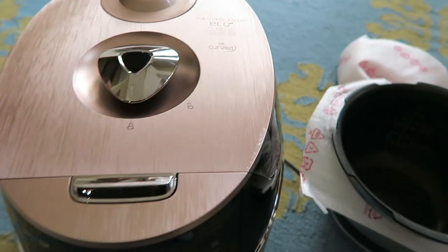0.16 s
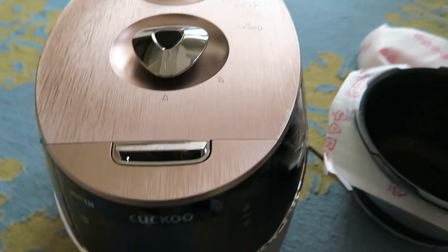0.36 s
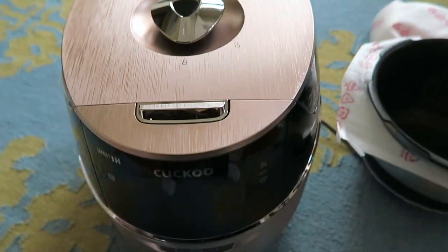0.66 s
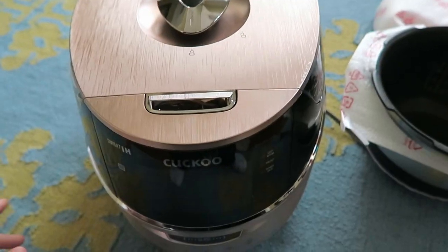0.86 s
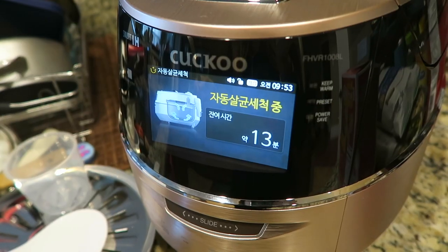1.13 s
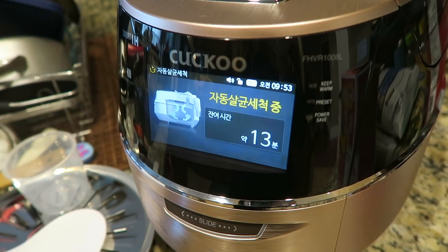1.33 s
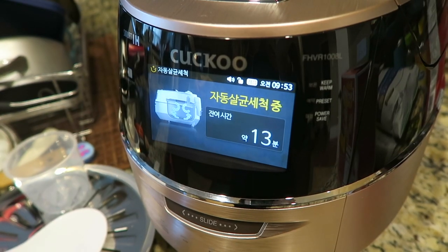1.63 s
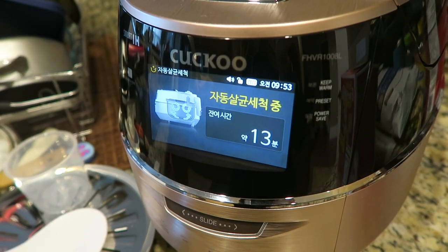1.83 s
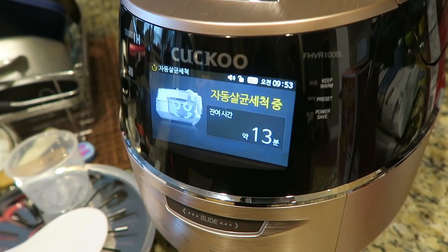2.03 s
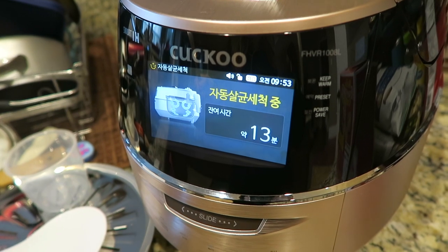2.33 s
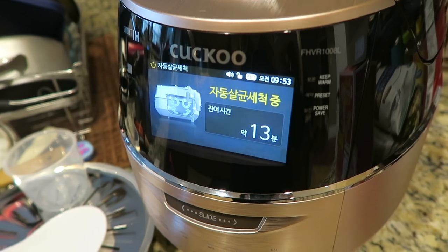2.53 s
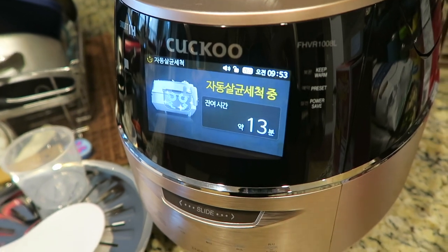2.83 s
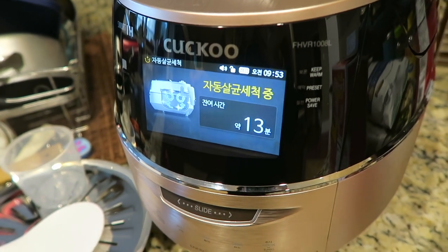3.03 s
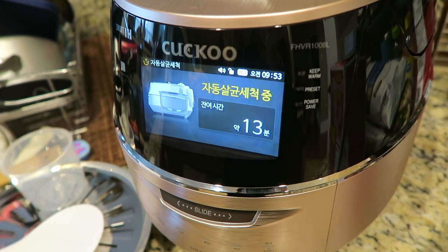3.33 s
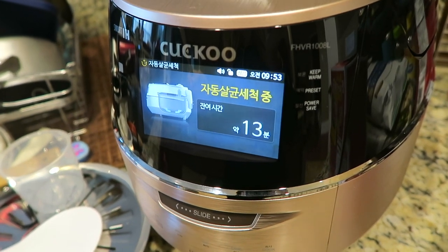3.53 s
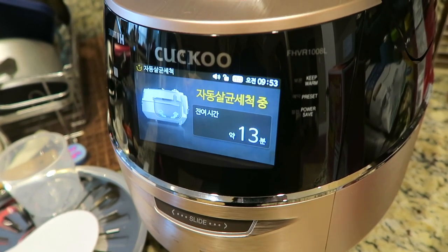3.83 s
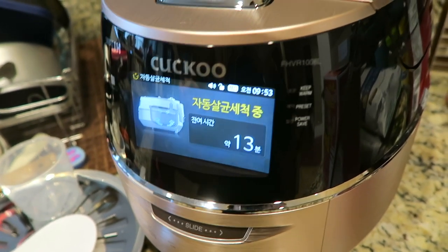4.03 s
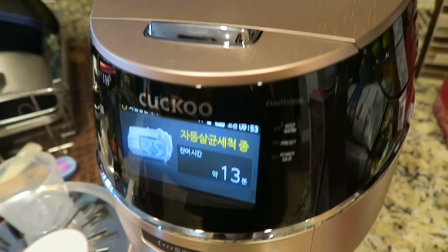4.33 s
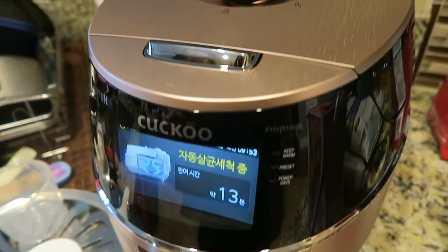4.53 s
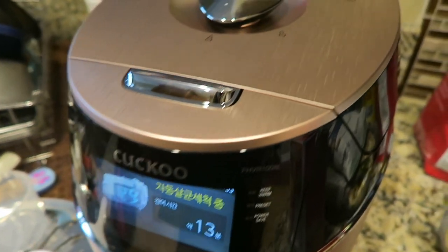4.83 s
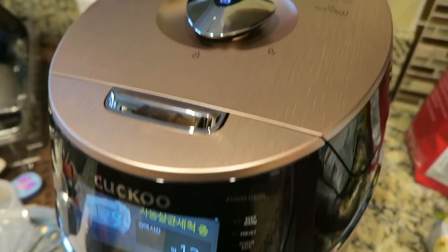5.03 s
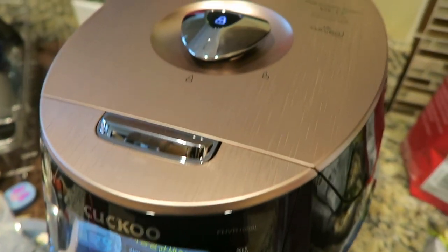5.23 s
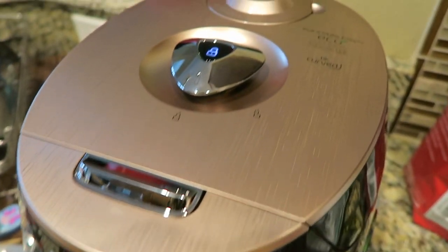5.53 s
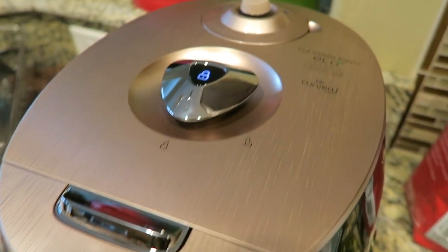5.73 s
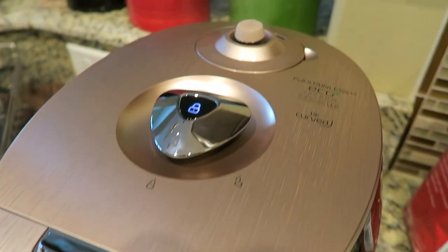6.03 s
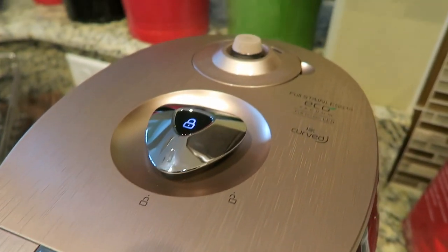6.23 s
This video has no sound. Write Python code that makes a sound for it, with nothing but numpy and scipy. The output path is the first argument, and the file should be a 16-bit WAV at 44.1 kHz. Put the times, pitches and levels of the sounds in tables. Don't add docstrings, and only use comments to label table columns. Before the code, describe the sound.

Near-silence first: weak motor hum, low building rumble, a soft lid knock, a cloth brush and a tiny ping. Then a hard cut to loud venting, close and nearly centred, with short reflections from the counter and tiles. A rocking weight chops the steam jet into irregular rough bursts; water seethes beneath and bubbles pop in the pipe. The camera rises from front to lid, slightly changing the hiss's colour.

```python
import sys
import numpy as np
from scipy import signal
from scipy.fft import rfft, irfft, next_fast_len
from scipy.io import wavfile
from scipy.ndimage import uniform_filter1d, map_coordinates

SR = 44100
rng = np.random.default_rng(int(sys.argv[2]) if len(sys.argv) > 2 else 0)


def magnitude_from_level(level_db):
    exponent = np.asarray(level_db, float) / 20
    return 10 ** exponent


def waveform_to_disk(signal):
    frames = np.transpose(np.atleast_2d(signal))
    scaled = np.clip(frames, -1, 1) * 32767
    samples = np.round(scaled).astype(np.int16)
    wavfile.write(sys.argv[1], SR, samples)


N = 281313
T = np.arange(N) / SR


def unit(x):
    return x / np.sqrt(np.mean(x ** 2) + 1e-20)


def along(points, hz):
    f, v = np.transpose(points)
    return np.interp(np.log(hz + 1), np.log(f + 1), v)


def curves(rows):
    s, *cols = np.transpose(rows)
    return [np.interp(T, s, c) for c in cols]


def wobble(rate):
    return map_coordinates(rng.standard_normal(int(N * rate / SR) + 4), [np.arange(N) * rate / SR])


def filtered(x, response):
    m = next_fast_len(N + 8192)
    return irfft(rfft(x, m) * response(np.fft.rfftfreq(m, 1 / SR)), m)[..., :N]


def rush(colour, alike, patchy_db):
    z = signal.stft(rng.standard_normal((2, N)), nperseg=512)[2]
    field = rng.standard_normal(z.shape[1:])
    field = uniform_filter1d(uniform_filter1d(field, size=6, axis=0), size=8, axis=1)
    pair = signal.istft(z * magnitude_from_level(patchy_db * unit(field)), nperseg=512)[1][:, :N]

    def mid_side_gain(hz):
        turn = np.arccos(np.clip(along(alike, hz), -1, 1)) / 2
        return magnitude_from_level(along(colour, hz)) * np.array([np.cos(turn), np.sin(turn)])

    mid, side = filtered(pair, mid_side_gain)
    return unit(np.array([mid + side, mid - side]))


# (frequency [Hz], level [dB rms], unsteadiness [dB], phase wander [rad])
HUM = [(191.4, -50.5, 1.5, 0.23), (435, -60.5, 1, 0.45), (463, -66, 5.5, .6), (385, -70, -1, .8)]


def hum():
    total = 0
    for hz, db, shake_db, wander_rad in HUM:
        level = np.sqrt(2) * magnitude_from_level(db + shake_db * wobble(13.5))
        total = total + level * np.sin(2 * np.pi * hz * T + wander_rad * wobble(13.1))
    return total


# (frequency [Hz], density [dB per Hz])
AIR = [(40, -40), (90, -21), (150, -2.5), (300, -2.5), (500, -9), (1000, -14), (2500, -23.5), (6000, -37.5),
       (12000, -42)]
# (frequency [Hz], left-right likeness [-1 to 1])
AIR_ALIKE = [(60, 0.9), (130, 0.48), (290, -0.58), (640, -0.4), (1410, -0.28), (3100, 0.33), (6820, -0.16),
             (15000, -0.065)]


def still_air():
    air_db, stirred_db, settle_s = -51.5, 6, 0.23
    level_db = air_db + stirred_db * np.exp(-T / settle_s) + 0.8 * wobble(9)
    return magnitude_from_level(level_db) * rush(AIR, AIR_ALIKE, patchy_db=1.7)


# (frequency [Hz], level [dB rms], width [Hz])
WHINE = (10500, -88, 60)


def whine():
    centre_hz, db, width_hz = WHINE
    band = filtered(rng.standard_normal(N), lambda hz: 1 / (1 + ((hz - centre_hz) / width_hz) ** 2))
    return magnitude_from_level(db) * unit(band)


# (frequency [Hz], density [dB per Hz])
HOUSE = [(12, -30), (25, -12.5), (57, 3), (80, -1), (120, 0.5), (170, -21), (300, -44.5)]


def house():
    return magnitude_from_level(-57.5) * rush(HOUSE, [(45, 0.9995), (120, 0.96)], patchy_db=0.2)


# (frequency [Hz], level [dB], decay to -60 dB [s])
KNOCK = [(204, -3, 0.08), (450, -0.5, 0.064), (720, -7, .045), (921, -13, 0.05)]


def knock():
    knock_s, rise_s = 0.043, 0.0011
    age = np.maximum(T - knock_s, 0)
    ring = sum(magnitude_from_level(db - 60 * age / t60) * np.sin(2 * np.pi * hz * age) for hz, db, t60 in KNOCK)
    dull = filtered(rng.standard_normal(N), lambda hz: 1 / (1 + (hz / 900) ** 3))
    thud = magnitude_from_level(-49 - 60 * age / 0.04) * unit(dull)
    return (magnitude_from_level(-30.5) * ring + thud) * (1 - np.exp(-age / rise_s))


# (frequency [Hz], density [dB per Hz])
RUSTLE = [(880, -30), (1500, -1), (4020, -1.5), (9330, -14), (11600, -14), (12800, -20), (15500, -24)]


def rustle():
    peak_db, rest_db, peak_s, width_s = -60, -66, 0.087, 0.045
    swell = magnitude_from_level(peak_db + 1.5 * wobble(60)) * np.exp(-((T - peak_s) / width_s) ** 2)
    return (magnitude_from_level(rest_db) + swell) * rush(RUSTLE, AIR_ALIKE, patchy_db=4.0)


# (time [s], level [dB], frequency [Hz], decay to -60 dB [s])
TICK = (.136, -49, 990, .07)


def tick():
    s, db, hz, t60 = TICK
    age = np.maximum(T - s, 0)
    return magnitude_from_level(db - 60 * age / t60) * np.sin(2 * np.pi * hz * age)


def room():
    return hum() + still_air() + whine() + knock() + rustle() + tick()


# (time seated [s], leak level [dB], open level [dB], share of
ROCKS = [(0.945, -16.4, -15.5, 0.27), (1.058, -30, -13.5, 0.49), (1.157, -32.5, -14, 0.4),
         (1.236, -34, -15, 0.5), (1.352, -19, -21.5, 0.1), (1.396, -35.5, -21.5, 0.75),
         (1.436, -24, -17, 0.59), (1.499, -25.5, -18, 0.77), (1.627, -26.5, -16.5, 0.57),
         (1.738, -36, -17, 0.6), (1.852, -25, -17.5, 0.4), (1.97, -27.5, -15.5, 0.61),
         (2.087, -33, -15.5, 0.44), (2.186, -28, -14.0, 0.61), (2.237, -23, -16, 0.06),
         (2.305, -29.5, -24.5, 0.63), (2.35, -31, -19, 0.39), (2.44, -24.5, -24, 0.4),
         (2.471, -29.5, -13.5, 0.36), (2.543, -32.5, -21.5, 0.63), (2.612, -25, -21, 0.7),
         (2.638, -23, -18.8, 0.58),
         (2.755, -36.5, -28.5, 0.37), (2.813, -34.9, -15.5, 0.54), (2.918, -21.5, -17.5, 0.27),
               (2.989, -31.5, -13, 0.42), (3.127, -34.5, -17.5, 0.77), (3.199, -26, -18.5, 0.53),
               (3.267, -30.5, -14.5, 0.53), (3.385, -19.5, -19, 0.25), (3.44, -21, -20, 0.4),
               (3.487, -28.5, -17.5, 0.31), (3.618, -25.5, -16, 0.39), (3.72, -19, -19, 0.4),
               (3.781, -20, -15.5, 0.83), (3.869, -29, -15, 0.56), (3.989, -26, -15.5, 0.36),
               (4.106, -24.5, -22.5, 0.38), (4.137, -29, -16.5, 0.47), (4.252, -30.5, -16.5, 0.56),
               (4.409, -25.5, -18, 0.54), (4.498, -23.5, -22, 0.71), (4.534, -24.5, -15.6, 0.77),
               (4.619, -23, -15.5, 0.3),
         (4.712, -27.5, -12, 0.19), (4.789, -33.5, -15, 0.3), (4.881, -23, -21, 0.25),
             (4.976, -28, -17.7, 0.61), (5.097, -25, -14, 0.39), (5.163, -20.4, -16.5, 0.32),
             (5.214, -24, -18, 0.94), (5.258, -20, -14.5, 0.34), (5.293, -32, -23, 0.6),
             (5.33, -22.5, -17, 0.44), (5.408, -28.7, -15.8, 1), (5.447, -21, -14, 0.18),
             (5.48, -21.0, -17.5, 0.56), (5.535, -20, -15.5, 0.26), (5.608, -33.5, -14.5, 0.65),
             (5.727, -19.5, -16, 0.86), (5.805, -20, -13.5, 0.4), (5.865, -20, -20, 0.18),
             (5.912, -35.5, -21, 0.26), (5.985, -37.5, -16.8, 0.8), (6.059, -33.5, -12, 0.55),
             (6.148, -29.5, -12, 0.41), (6.239, -33.5, -24, 0.45), (6.298, -32, -17, 0.72),
             (6.429, -27, -16.8, 0.1)]


def lift():
    roundness = 0.93
    s, leak_db, open_db, rising = np.transpose(ROCKS)
    rock = np.interp(T, s, np.arange(len(s)))
    k = np.minimum(rock.astype(int), len(s) - 2)
    progress = rock - k
    top = np.clip(rising[k], 0.05, 0.95)
    arch = np.sin(np.pi / 2 * np.minimum(progress / top, (1 - progress) / (1 - top)))
    seat_db = np.interp(T, s, leak_db)
    return seat_db + (open_db[k] - seat_db) * np.abs(arch) ** roundness


# (delay low down [ms], delay high up [ms], level [dB])
WALLS = [(1.9, 2.38, -25.5), (3.4, 3.1, -19.5), (5.3, 5.9, -16), (8.2, 7.4, -19), (12.5, 13.6, -19)]


def echoes(x, height):
    out = x.copy()
    for k, (low_ms, high_ms, db) in enumerate(WALLS):
        lag = (low_ms + (high_ms - low_ms) * height + 0.03 * wobble(1.2)) * SR / 1000
        skew = (-1) ** k * 0.85
        late = [map_coordinates(ear, [np.arange(N) - lag - offset], order=1)
                for ear, offset in zip(x, (skew, -skew))]
        out = out + magnitude_from_level(db) * np.array(late)
    return out


# (frequency [Hz], density [dB per Hz])
JET = [(290, -64), (500, -28.5), (889, -25), (1200, -20), (1510, -14.5), (2810, -1), (3290, -6.5),
       (4510, -6.5), (5510, -11.5), (6190, -12), (8490, -27.5), (13600, -37.5), (15500, -60)]
# (frequency [Hz], left-right likeness [-1 to 1])
JET_ALIKE = [(60, 0.99), (130, 1), (290, 0.86), (640, 0.92), (1410, 1), (3100, 0.98), (6820, 0.94),
             (15000, 0.61)]
# (frequency [Hz], width [Hz], gain from the front [dB], gain from above
# [dB])
LID = [(583, 40, -21.5, -25), (800, 350, 3, 0), (1133, 144, -8, -3.5), (2108, 130, 4, 3.5),
       (2215, 60, -4, -15), (2380, 320, 3.5, 6.5), (2833, 400, 3.5, 4.5), (3216, 130, -5, -4.5),
       (3740, 520, 4.5, 0), (4050, 110, -5.5, 2.5), (4614, 270, 5.5, 1), (5620, 230, -2.5, -3),
       (6000, 240, 2, 5.5), (6790, 150, 5, 5.5),
       (9800, 450, 1.5, 2.5), (12760, 390, 8, 1), (12960, 120, -9, -10), (13300, 500, 4, 2)]
# (time [s], height [0-1])
RISE = [
    (4.2, 0.02),
    (5.1, 0.94),
]
# (time [s], boiling level [dB], water in the pipe [dB], camera in line with the jet [dB])
BOILER = [(1.03, -42, -3, 7), (1.2, -47, -4.5, 2), (1.4, -45.5, 6, 2), (1.69, -43.5, 2.5, 5),
          (1.9, -44, 5, 4), (2.19, -42.5, -2.5, 5), (2.55, -46, -4.5, 2), (2.85, -45, 1.5, -5),
          (3.18, -47, -1.5, -3), (3.55, -46, -0.5, -2), (4.0, -45, -0.5, -6), (4.33, -47, 7, 2),
          (4.6, -42, -4.5, 1), (4.95, -45, -2.5, 8), (5.45, -43, -3.5, 7), (5.75, -41.5, 7, -1),
          (5.98, -43, -1.5, -1), (6.2, -43.5, -1, 11)]


def steam():
    lift_db = uniform_filter1d(lift(), size=130) + 17.78
    _, water_db, aim_db = curves(BOILER)
    height = curves(RISE)[0]
    chest_db = 0.95 * water_db + 1.0 * wobble(4.8)
    pipe_db = 0.65 * water_db + 0.52 * wobble(7.3)
    spray_db = 0.23 * water_db + 0.017 * aim_db + 0.27 * wobble(6)
    mist_db = aim_db + 1.5 * wobble(8.2)
    bare = rush(JET, JET_ALIKE, patchy_db=1.9)

    def through_lid(view):
        def response(hz):
            return magnitude_from_level(sum(m[view] / (1 + (2 * (hz - m[0]) / m[1]) ** 2) for m in LID))
        return filtered(bare, response)

    def below(edge_hz):
        return filtered(jet, lambda hz: 1 / (1 + (hz / edge_hz) ** 16))

    def flutter():
        return 0.33 * wobble(35)

    jet = (1 - height) * through_lid(view=2) + height * through_lid(view=3)
    cuts = [0, *(below(hz) for hz in (1150, 2000, 3300, 5200, 7600, 13000)), jet]
    chest, pipe, whistle, core, fizz, spray, mist = (hi - lo for lo, hi in zip(cuts, cuts[1:]))
    puffs = magnitude_from_level(1.08 * lift_db + chest_db + 0.7 * wobble(5.2)) * chest
    puffs = puffs + magnitude_from_level(0.91 * lift_db + pipe_db + flutter()) * pipe
    puffs = puffs + magnitude_from_level(lift_db + flutter()) * whistle
    puffs = puffs + magnitude_from_level(0.91 * lift_db + 0.11 * spray_db + flutter()) * core
    puffs = puffs + magnitude_from_level(1.36 * lift_db + 0.35 * spray_db + flutter()) * fizz
    puffs = puffs + magnitude_from_level(1.33 * lift_db + spray_db + 0.6 * height + flutter()) * spray
    puffs = puffs + magnitude_from_level(0.8 * lift_db + 1.3 * mist_db) * mist
    return echoes(magnitude_from_level(1.28 * wobble(70)) * puffs, height) * magnitude_from_level(-20.0)


# (frequency [Hz], density [dB per Hz])
BOIL = [(90, -13), (140, -7.5), (200, 2.5), (260, 1), (340, 0), (440, -6), (580, -9.5), (800, -5.5),
        (1100, -10.5), (2000, -26)]


def boiling():
    rumble = rush(BOIL, JET_ALIKE, patchy_db=1.8)
    phase = 2 * np.pi * 447 * T + 0.5 * wobble(3.9)
    tone = np.sin(phase) + 0.44 * np.sin(2 * phase)
    fridge_hum = magnitude_from_level(-54 + 3.5 * wobble(6)) * curves(RISE)[0] ** 6 * tone
    return magnitude_from_level(curves(BOILER)[0] + 0.74 + 1.1 * wobble(12)) * rumble + fridge_hum


# (time [s], peak level [dB], frequency [Hz])
GLUGS = [(1.455, -38, 890), (1.535, -33, 860), (1.607, -34, 870), (1.788, -31, 810), (1.919, -28, 885),
         (2.085, -33.5, 676), (2.13, -25, 785), (2.174, -33, 750), (2.241, -35, 880), (2.475, -35, 826),
         (2.54, -37, 714), (2.833, -42, 780), (3.024, -37, 990), (3.154, -35, 770), (3.4, -31, 965),
         (3.682, -36, 940), (3.926, -35, 720), (4.046, -33.5, 806), (4.65, -32, 766), (4.796, -31, 706),
         (4.875, -32.5, 664), (5.153, -35, 990), (5.554, -43, 864), (5.679, -32, 980), (5.769, -31, 770),
         (5.841, -30, 804), (5.974, -37, 880), (6.159, -28, 673), (6.187, -33, 689), (6.235, -31.5, 680)]


def glugs():
    out = np.zeros(N + SR)
    t = np.arange(SR // 10) / SR
    envelope = magnitude_from_level(0.5 - 60 * t / 0.062) * (1 - np.exp(-t / 0.0016))
    for s, db, hz in GLUGS:
        phase = 2 * np.pi * hz * t * (1 + 1.03 * t)
        second_ratio = 1.1 + 0.075 * rng.standard_normal()
        pair = np.sin(phase) + 0.5 * np.sin(second_ratio * phase)
        out[round(s * SR):][:len(t)] += magnitude_from_level(db) * envelope * pair
    return out[:N]


def scene():
    change_s, fade_s = 0.968, 0.0105
    fade = np.clip((T - change_s) / fade_s, 0, 1) ** 2
    cooker = steam() * magnitude_from_level([[-0.25], [0.25]]) + boiling() * magnitude_from_level([[-0.4], [0.4]]) + glugs()
    return (1 - fade) * room() + fade * cooker + house()


def band_limit(x):
    return signal.sosfilt(signal.butter(12, 15730, fs=SR, output="sos"), x)


def record(dry):
    soft = dry / (1 + np.abs(dry / 0.88) ** 4) ** (1 / 4)
    return band_limit(soft)


dry = scene()
out = record(dry)
waveform_to_disk(out)
```